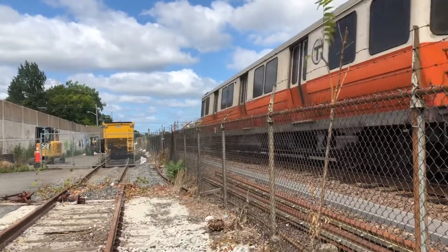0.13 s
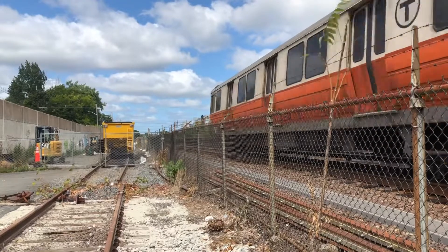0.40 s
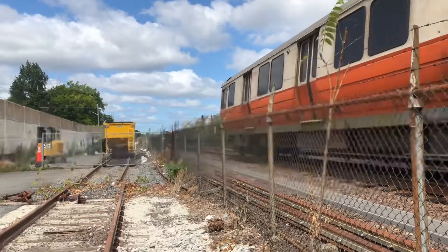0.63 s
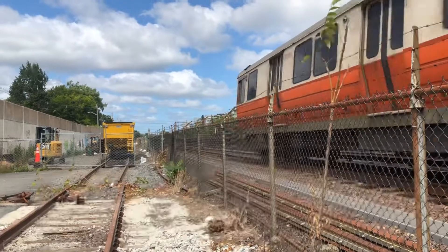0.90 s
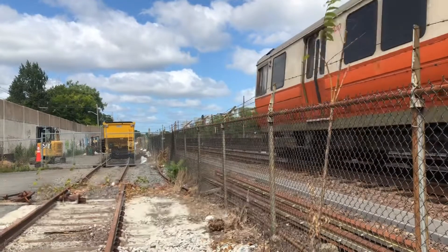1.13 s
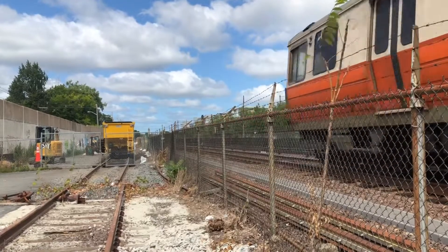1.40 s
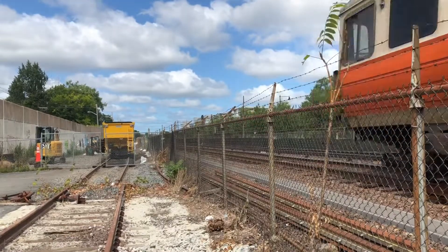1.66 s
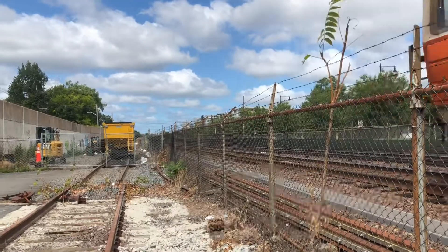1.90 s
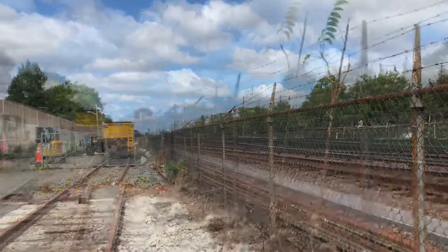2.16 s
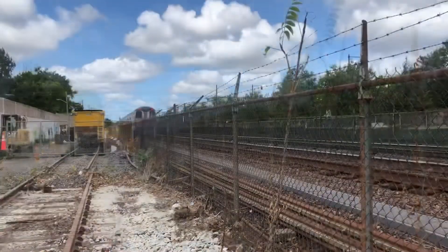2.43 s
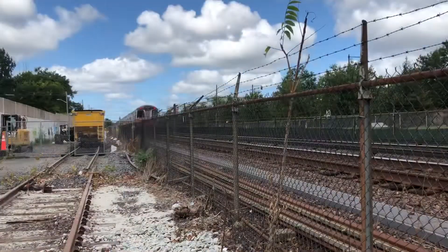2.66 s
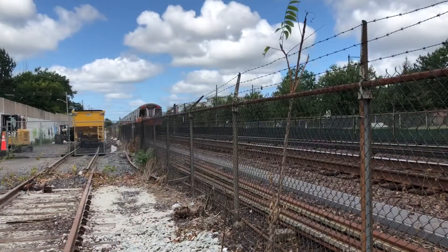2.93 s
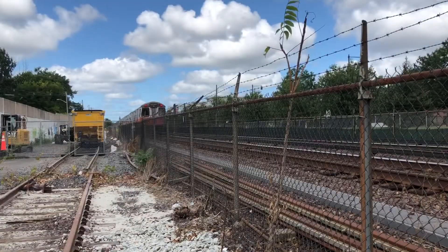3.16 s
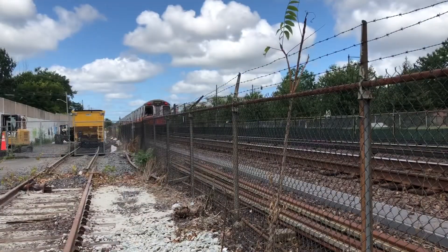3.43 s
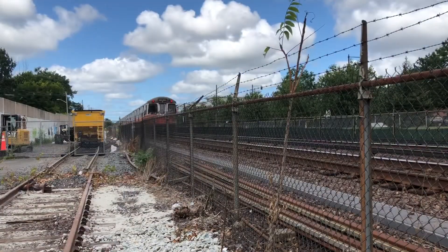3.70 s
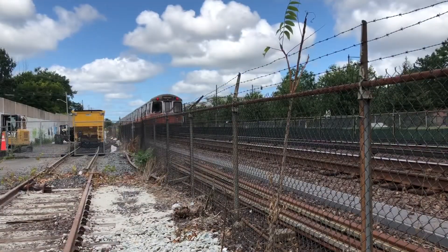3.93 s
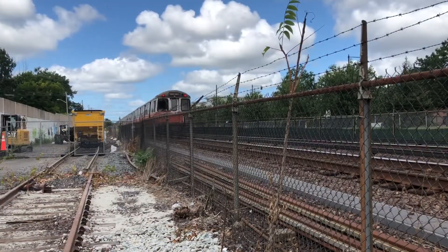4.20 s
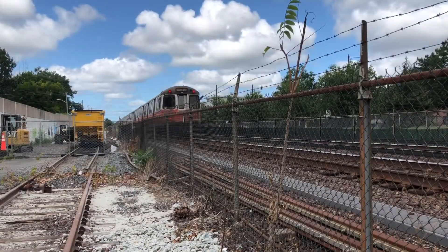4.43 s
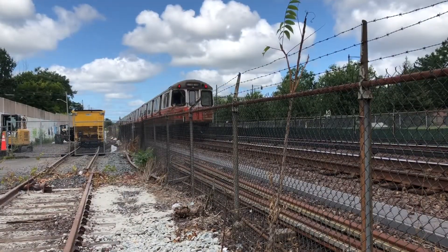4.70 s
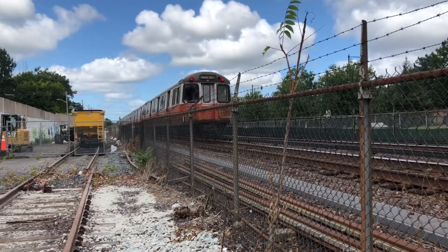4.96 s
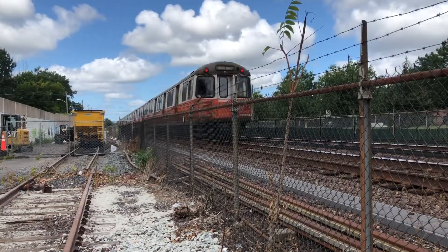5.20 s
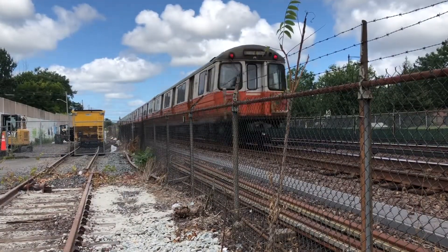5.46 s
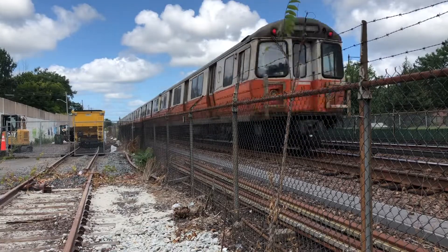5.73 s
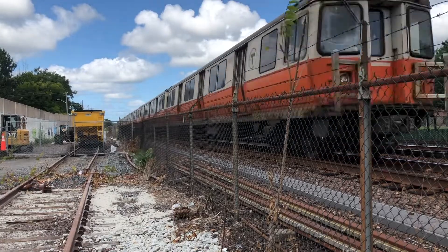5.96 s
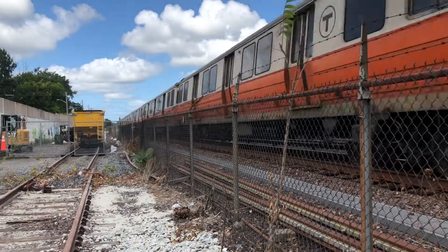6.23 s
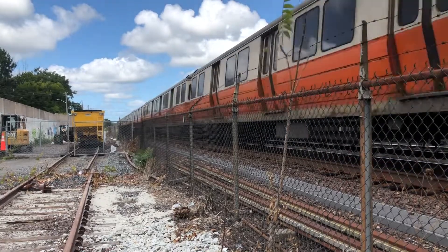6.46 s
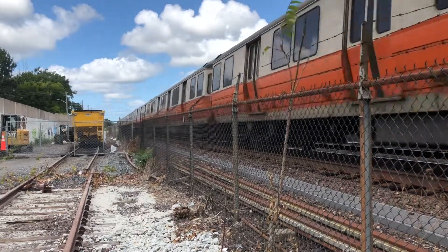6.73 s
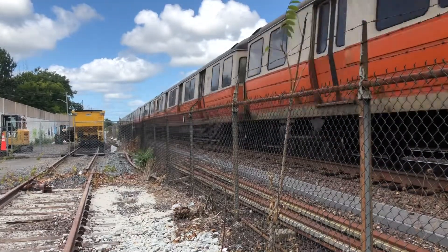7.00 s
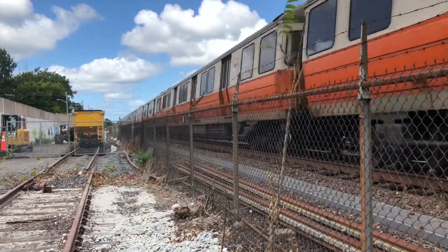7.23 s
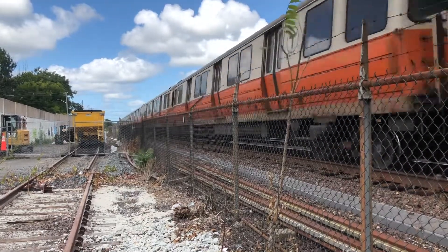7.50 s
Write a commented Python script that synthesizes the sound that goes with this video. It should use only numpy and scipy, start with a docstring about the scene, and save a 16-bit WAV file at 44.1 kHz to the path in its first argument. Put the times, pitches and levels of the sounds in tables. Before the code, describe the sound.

Close beside railway tracks outdoors, heard evenly in both channels. From 0 to 1.3 s an electric train rolls away in a loud, rough roar with low rumble, dense clacks and thuds about every 0.1 s, and rough chirping squeaks around 4.5 kHz roughly every 0.2 s. At about 1.4 to 1.7 s a piercing, very high squeal flares and fades while the roar falls; looser rolling noise and clatter remain until 2.4 s. At 2.5 s it drops to near quiet: faint treble fizz, tiny ticks, distant low hum. From 4.3 s light clacks approach; steel hisses swell near 4.0, 4.8, 5.55 and, strongest, 6.35 s. Clacks grow heavier from 5.4 s. At 6.4 s a bright flange scrape rings with thin sinking whines, fading by 6.75 s. A weaker hiss comes at 7.1 s, and the roar swells to full loudness by the end at 7.6 s.

```python
"""Beside a yard fence, one microphone: an electric train rolls away, a wheel squeaking once a turn and another
squealing high. After a sudden drop to near quiet a second train comes up from afar, clacking over rail joints,
hissing in regular swells, and scrapes a wheel into ringing as it arrives. Tilting coloured noise makes the roar,
rumble and hiss; noise bursts ring the rail; stick-slip tones squeak, squeal and whine; resonances ring and hum."""
import sys
import numpy as np
from scipy import signal
from scipy.io import wavfile
from scipy.ndimage import uniform_filter1d, minimum_filter1d

SR = 44100
rng = np.random.default_rng(int(sys.argv[2]) if len(sys.argv) > 2 else 0)


def wrap_up_sound(samples):
    """Save the sound to the file named by the first command line argument, as 16-bit audio."""
    columns = np.atleast_2d(samples).T
    # keep every value between -1 and 1, then stretch to whole-number steps
    tamed = np.clip(columns, -1, 1)
    steps = np.round(tamed * 32767).astype(np.int16)
    wavfile.write(sys.argv[1], SR, steps)


def amplitude_ratio(level_db):
    """Convert a level in decibels to the matching linear amplitude (field) ratio."""
    exponent = np.asarray(level_db, float) / 20
    return 10 ** exponent


N = 336042  # length in samples

# rolling noise of wheels on rails: [t/s, roar level/dB, roar tilt/dB per octave,
# rumble level/dB, rumble tilt/dB per octave]
ROLLING_NOISE = [(0, -12, -.8, -20, 0.5), (.35, -12, 0.1, -18, -0.5), (.86, -14.5, 0.86, -17.5, 4),
                 (1.385, -17.5, -0.5, -16, -0.5), (1.42, -22.5, -2.5, -27.5, 1),
                 (1.98, -18, 0.4, -25.5, -5), (2.2, -16.5, -0.5, -23, 2), (2.25, -26, -0.5, -22.5, -0.5),
                 (2.46, -26.5, -1.5, -30, 5), (2.5, -34.5, .1, -35.5, -4), (3.1, -33, 0.6, -35.5, .1),
                 (4.03, -32, 1.35, -33.5, 1), (4.67, -29.5, 1.6, -28.5, 1.5), (5.04, -29, 1.1, -31.5, 4.5),
                 (5.47, -25, 1.5, -25.5, 3), (6.09, -23.5, 0.4, -29, 2.5), (6.53, -18, 1.5, -23, 5),
                 (6.99, -20, -0.5, -28.5, 7.5), (7.29, -17, -0.7, -28.5, 10.5), (7.62, -11, 0.3, -29, 8)]
# modes of rail and wheel, rung by the joints and singing under the rolling load:
# [f/Hz, nominal width/Hz, blow level before tilt/dB, singing level re roar/dB]
RAIL_MODES = [(717, 168, 8.5, -19), (975, 92, 2, -42), (1096, 170, -2, -22), (1517, 113, -5, -24.5),
              (1840, 96, -17, -27), (2110, 130, -10.5, -44), (2437, 160, -12.5, -27),
              (3263, 120, -16, -26.5), (4200, 75, -19, -30), (5260, 68, -21, -32), (6370, 180, -21, -29.5)]


def evened(x):
    """Scales to rms 1."""
    return x / np.sqrt(np.mean(x ** 2) + 1e-20)


def add(mix, start_s, sound):
    """Mixes a sound in at a time, cut off where the mix ends."""
    part = mix[round(start_s * SR):][:len(sound)]
    part += sound[:len(part)]


def band(x, lo_hz, hi_hz):
    """Band-pass."""
    sos = signal.butter(4, [lo_hz, min(hi_hz, SR / 2.1)], "bandpass", fs=SR, output="sos")
    return signal.sosfilt(sos, x)


def resonate(x, hz, width):
    """A resonance of gain 1 at a fixed or gliding pitch: shifts it to zero, smooths, and shifts back."""
    turn = np.exp(2j * np.pi * np.cumsum(hz * np.ones(len(x))) / SR)
    decay = np.exp(-np.pi * abs(width) / SR)
    return 2 * (turn * signal.lfilter([1 - decay], [1, -decay], x / turn)).real


def columns(rows):
    """Start time, and every further column sample by sample."""
    s, *rest = np.transpose(rows)
    t = np.arange(s[0], s[-1], 1 / SR)
    return [s[0]] + [np.interp(t, s, c) for c in rest]


def wobble(count, rate_hz):
    """Slow random drift of rms 1."""
    return evened(uniform_filter1d(rng.standard_normal(count), size=round(SR / rate_hz)))


def wash(colour, s, level_db, tilt, pivot_hz, patchy_db, flicker_db, size):
    """Noise of a given colour that tilts about a pivot, with drifting patches and a shared flicker."""
    hop = size // 4
    hz = np.fft.rfftfreq(size, 1 / SR) + 1  # keeps the logarithms finite
    frames = N // hop + 5
    a, b, patches = rng.standard_normal((frames, len(hz), 3)).T
    patches = uniform_filter1d(patches, size=8, axis=0)  # over frequency
    patches = evened(uniform_filter1d(patches, size=8, axis=1))  # over time
    flicker = evened(uniform_filter1d(rng.standard_normal(frames), size=4))
    f, db = np.transpose(colour)
    shape_db = np.interp(np.log(hz), np.log(f), db, left=-100, right=-100)
    shape_db = shape_db - 10 * np.log10(np.sum(amplitude_ratio(shape_db) ** 2))  # unit total power
    t = np.arange(frames) * hop / SR
    tilted_db = np.log2(hz / pivot_hz)[:, None] * np.interp(t, s, tilt)
    moving_db = np.interp(t, s, level_db) + patchy_db * patches + flicker_db * flicker
    field = amplitude_ratio(shape_db[:, None] + tilted_db + moving_db)
    return signal.istft((a + 1j * b) * field, nperseg=size, noverlap=size - hop)[1][:N]


def slip(hz, rough, width):
    """A stick-slip tone of rms near 1: a sine with a share of narrow noise around it."""
    fuzz = evened(resonate(resonate(rng.standard_normal(len(hz)), hz, width), hz, width))
    sine = np.sin(2 * np.pi * np.cumsum(hz) / SR)
    return np.sqrt(2 - 2 * rough) * sine + np.sqrt(rough) * fuzz


def rolling():
    """Wheels rolling on rails roar and the car bodies rumble: two coloured noises that tilt over time."""
    # spectra of roar and rumble: [f/Hz, relative level/dB per Hz]
    roar_colour = [(120, -32), (200, 1.5), (238, 0.5), (762, -1), (1140, -10), (1290, -12.5), (1640, -14),
                   (2950, -23.5), (3250, -21), (3990, -22), (4540, -23), (4910, -25.5), (9000, -36),
                   (11700, -70), (19800, -120)]
    rumble_colour = [(18, -49), (30, -5), (75, -14), (113, -1), (206, -2.5), (260, -10), (340, -20),
                     (570, -120)]
    s, level_db, tilt, bass_db, bass_tilt = np.transpose(ROLLING_NOISE)
    roar = wash(roar_colour, s, level_db, tilt, pivot_hz=630, patchy_db=2.0, flicker_db=0.87, size=512)
    rumble = wash(rumble_colour, s, bass_db, bass_tilt, pivot_hz=130, patchy_db=1.67, flicker_db=0.9,
                  size=1024)
    return roar + rumble


def clacks():
    """Each joint: a short rattle rings the rail; slower low waves thud a little later; a crack on top."""
    # wheels over rail joints: [t/s, knock level/dB, nominal thud level/dB, nominal crack level/dB,
    # rattle length/s]
    joints = [(0.073, -15, -13.5, -23.5, .021), (0.162, -25, -9.5, -23, .035),
              (.255, -11.5, -11.5, -16.5, 0.023), (.349, -22, -7.5, -27, .025),
              (.454, -15.5, -9, -19, 0.0092), (.551, -18, -6.5, -24, 0.036), (0.655, -9, -13, -19, 0.0075),
              (.854, -14.5, -8, -21, 0.017), (1.058, -17.5, -5, -28, 0.013), (1.173, -22, -11, -41, 0.01),
              (1.269, -18, -11, -37, .021), (1.566, -26, -14, -28, 0.023), (1.745, -21, -14, -32, 0.035),
              (1.782, -25, -12.5, -28, 0.011), (1.965, -21, -9, -22, .025), (2.075, -27, -24, -26.5, .029),
              (2.162, -20.5, -16.5, -29, .02), (2.295, -29, -29.5, -34, .029),
              (2.359, -30, -21, -37, 0.012), (4.307, -29.5, -32, -52, 0.043), (4.408, -35, -38, -55, .028),
              (4.466, -30, -22, -36, .019), (4.618, -29.5, -23, -38, 0.037), (4.77, -44, -31, -44, .025),
              (4.931, -32.5, -29, -52, 0.041), (5.053, -28, -32, -53, 0.07),
              (5.095, -27.5, -28, -36, 0.035), (5.214, -27.5, -30, -50, 0.048),
              (5.248, -31, -23, -43, .031), (5.37, -23.5, -28.5, -49, 0.054),
              (5.398, -23.5, -14, -29, 0.035), (5.529, -31, -23, -42, 0.035), (5.555, -30, -16, -37, .03),
              (5.841, -19, -17.5, -45, 0.034), (5.869, -30, -25, -44, 0.022),
              (5.998, -22, -16.5, -41, 0.064), (6.154, -19.5, -12.5, -41, 0.022),
              (6.432, -23, -10.5, -25, .025), (6.612, -14, -11.5, -21, 0.018),
              (6.717, -29, -25, -26.5, .034), (6.767, -15.5, -19, -29, 0.015), (6.864, -25, -36, -48, .011),
              (7.279, -23.5, -28, -32, 0.03), (7.414, -20.5, -33, -39, .01), (7.503, -23, -37, -44, .022)]
    knock_tilt = 3.5  # dB per octave about 900 Hz
    out = np.zeros(N)
    t = np.arange(SR // 5) / SR
    for s, knock_db, thud_db, crack_db, length in joints:
        a, c, d = rng.standard_normal((len(t), 3)).T
        # a first blow, then chatter
        rattle = (np.sign(a) + 1.64 * (t < .0004)) * np.exp(-(t / length) ** 2)
        knock = np.zeros(len(t))
        for hz, nominal_width, db, _ in RAIL_MODES:
            width = 1.57 * nominal_width
            mode = resonate(resonate(rattle, hz, width), hz, width)
            knock += amplitude_ratio(db + knock_tilt * np.log2(hz / 900)) * mode / np.sqrt(nominal_width)
        knock = band(knock, 347, 5400)
        knock = knock / np.sqrt(np.mean(knock[:SR // 40] ** 2))  # rms 1 over the first 25 ms
        thud = evened(band(c, 100.0, 407)) * (t / 0.02) * np.exp(1 - t / .012)
        crack = evened(evened(band(d, 2800, 7900)) + 0.28 * evened(band(d, 8900, 15000)))
        crack = crack * (1 - np.exp(-t / 0.0016)) * amplitude_ratio(-60 * t / 0.13)
        add(out, s, amplitude_ratio(knock_db) * knock + amplitude_ratio(thud_db) * thud + amplitude_ratio(crack_db) * crack)
    return out


def hiss():
    """Steel sliding on steel: a steady fine hiss plus swells that set in quickly, climb to a peak and fade."""
    # steady hiss: [t/s, level/dB, tilt/dB per octave]
    steady_hiss = [(0, -28, -2.5), (.6, -32, -3), (1.2, -33.5, 0), (1.4, -35, -3.5), (1.63, -37.5, -1.5),
                   (1.85, -41.5, -3), (1.96, -31.5, -5), (2.2, -36, -5.5), (2.44, -48, -6), (2.51, -68, .1),
                   (3.8, -60, .1), (4.3, -53, -7), (5.1, -44, 6), (5.9, -39, -1.5), (6.75, -33, -1.5),
                   (7.0, -35.5, -3), (7.3, -32.5, -3), (7.62, -30.5, -5.5)]
    # spectrum of the hiss: [f/Hz, relative level/dB per Hz]
    hiss_colour = [(1470, -41), (2500, -5), (2940, -9.5), (4090, -7.5), (4550, -7), (9030, -5.5),
                   (13300, -8), (15700, -18.5)]
    # swells of the second train at nearly even intervals: [peak t/s, peak level/dB, lead-in/s]
    swells = [(4.0, -37, .13), (4.78, -33, 0.17), (5.55, -23.5, 0.15), (6.35, -15.5, 0.17),
              (7.08, -28, 0.029)]
    onset_s, rise_db_per_s, fall_db_per_s = 0.065, 60, 75
    swell_tilt = 0.5  # dB per octave
    t = np.arange(0, N / SR, .002)
    at, level_db, tilt = np.transpose(steady_hiss)
    steady_power = amplitude_ratio(np.interp(t, at, level_db)) ** 2
    swell_power = np.zeros(len(t))
    for s, db, lead in swells:
        onset = np.clip((t - s + lead) / onset_s + .5, 0, 1)  # half open one lead-in ahead of the peak
        slope_db = np.minimum(rise_db_per_s * (t - s), fall_db_per_s * (s - t))
        swell_power += onset ** 2 * amplitude_ratio(db + slope_db) ** 2
    power = steady_power + swell_power
    tilt = (np.interp(t, at, tilt) * steady_power + swell_tilt * swell_power) / power
    return wash(hiss_colour, t, 10 * np.log10(power), tilt, pivot_hz=8400, patchy_db=0.7, flicker_db=1.1,
                size=256)


def squeaks():
    """Stick-slip once a turn: a rough wobbling chirp grows to a late peak, where its overtones are strongest."""
    # chirps: [start t/s, length/s, peak level/dB, start f/Hz, end f/Hz]
    chirps = [(0.034, 0.09, -21, 4600, 4550), (0.22, 0.086, -18, 4610, 4520),
              (0.447, 0.066, -17, 4470, 4620), (.598, 0.094, -13, 4603, 4480),
              (0.792, 0.099, -13.5, 4614, 4400), (1.036, .055, -21, 4400, 4480),
              (1.197, 0.1073, -19.5, 4416, 4260), (1.401, 0.126, -22.5, 4350, 4290)]
    # overtones: [multiple of f, level at the peak re fundamental/dB]
    overtones = [(2, -17), (3, -25)]
    out = np.zeros(N)
    for s, length, peak_db, start_hz, end_hz in chirps:
        u = np.linspace(0, 1, round(length * SR))  # share of the length
        hz = start_hz + (end_hz - start_hz) * u + 40.3 * wobble(len(u), rate_hz=48)
        shape_db = np.interp(u, [0, 0.57, 1], [-10, 0, -12])
        tone = slip(hz, rough=0.75, width=126)
        upper = sum(amplitude_ratio(db) * slip(k * hz, rough=.7, width=200) for k, db in overtones)
        tone = tone + amplitude_ratio(shape_db) * upper
        add(out, s, amplitude_ratio(peak_db + shape_db) * tone * signal.windows.tukey(len(hz), .2))
    return out


def squeal():
    """Two wheel modes: a steady clean tone and a rough one that sinks towards it, in a skirt of friction noise."""
    # lower and higher squeal: [t/s, tone level/dB]
    low_levels = [(1.05, -49), (1.2, -41), (1.27, -34), (1.38, -12), (1.432, -8), (1.52, -15), (1.718, -32),
                  (1.87, -32), (2.1, -58)]
    high_levels = [(1.1, -47), (1.26, -36), (1.364, -29), (1.384, -20), (1.465, -21), (1.496, -11),
                   (1.708, -18), (1.836, -35), (2.0, -55)]
    sag_from_s = 1.5
    out = np.zeros(N)
    # levels, starting pitch in Hz, sag in Hz per s, share of noise
    for rows, top_hz, sag, rough in ((low_levels, 12646, 0, .15), (high_levels, 12890, 450, .6)):
        s, level_db = columns(rows)
        t = s + np.arange(len(level_db)) / SR
        hz = top_hz - sag * np.maximum(t - sag_from_s, 0)
        friction = band(rng.standard_normal(len(hz)), 12060, 13150)
        skirt = evened(resonate(friction, 12750, 700))
        tone = slip(hz, rough, width=140) + amplitude_ratio(-5) * skirt
        add(out, s, amplitude_ratio(level_db) * tone * signal.windows.tukey(len(hz), .1))
    return out


def scrape():
    """Flange friction noise drives the high modes of the wheel, with a broad bite near the start."""
    # ringing under the scrape: [t/s, level/dB]
    scrape_levels = [(6.37, -26), (6.41, -18), (6.48, -28), (6.596, -26.5), (6.702, -42), (6.75, -42)]
    # modes the scrape rings: [f/Hz, nominal width/Hz, relative level per root Hz of width/dB]
    wheel_modes = [(8830, 31, -9), (9590, 46, -4), (10400, 110, -1), (10900, 36, -10), (12500, 130, -1),
                   (12800, 84, -4), (14100, 54, -3), (14600, 110, 0), (15500, 60, -2)]
    out = np.zeros(N)
    s, level_db = columns(scrape_levels)
    noise = rng.standard_normal((len(level_db), len(wheel_modes) + 1)).T
    sink = np.linspace(1.008, .985, len(level_db))  # pitch sinks as the wheel draws level
    ring = np.zeros(len(level_db))
    for v, (hz, width, db) in zip(noise, wheel_modes):
        ring += amplitude_ratio(db) * np.sqrt(width) * evened(resonate(v, hz * sink, 0.94 * width))
    t = np.arange(len(ring)) / SR
    bite = evened(band(noise[-1], 5200, 8200)) * np.exp(-((t - .045) / 0.032) ** 2)
    sound = amplitude_ratio(level_db) * evened(ring) + amplitude_ratio(-16.5) * bite
    add(out, s, sound * signal.windows.tukey(len(ring), .15))
    return out


def whines():
    """Gliding narrow tones set in quickly, flicker and fade; high and far-gliding ones are fuzzier."""
    # short whines and whistles: [start t/s, end t/s, start f/Hz, end f/Hz, mid level/dB]
    glides = [ (.12, .45, 1680, 1590, -31), (.55, .66, 1575, 1550, -21), (.3, .42, 1950, 1940, -29),
              (.48, .66, 1900, 1880, -28), (.3, .58, 2140, 2100, -33), (.25, .36, 2430, 2430, -33),
              (.305, .345, 3260, 3210, -24), (1.62, 1.76, 4350, 4260, -39), (1.96, 2.1, 2380, 2360, -44),
              (2.05, 2.4, 4230, 4170, -41), (2.15, 2.4, 3270, 3200, -41), (2.25, 2.47, 5220, 5170, -50),
              (1.95, 2.1, 6290, 6230, -40), (6.45, 6.8, 4340, 4040, -38), (7.0, 7.6, 3600, 3350, -39),
              (1.3, 1.52, 10460, 10470, -47), (1.35, 1.5, 8020, 7970, -48), (2.42, 2.5, 10430, 10460, -44),
              (2.5, 2.9, 13030, 13030, -55), (2.55, 2.85, 15160, 15160, -47), (4.0, 5.4, 7127, 7127, -56),
              (4.42, 4.56, 10670, 10670, -45), (4.42, 4.56, 10140, 10120, -52),
              (4.63, 4.8, 10440, 10440, -41), (5.4, 5.52, 10450, 10450, -36),
              (5.69, 5.85, 10360, 10350, -40), (7.15, 7.35, 10440, 10380, -48),
              (6.39, 6.47, 5830, 5810, -20), (6.44, 6.6, 5820, 5820, -38), (6.385, 6.415, 6070, 6050, -22),
              (6.46, 6.63, 6480, 6330, -34), (6.37, 6.51, 7700, 8100, -25), (6.52, 6.68, 8000, 7850, -34),
              (6.5, 6.63, 8420, 8250, -35)]
    out = np.zeros(N)
    for start, end, start_hz, end_hz, db in glides:
        hz = np.linspace(start_hz, end_hz, round((end - start) * SR))
        # width in Hz: a floor, a share of the pitch, a share of the glide
        width = 12 + 0.0039 * start_hz + 0.41 * abs(end_hz - start_hz)
        t = np.arange(len(hz)) / SR
        fade_in, fade_out = t / 0.018, (t[-1] - t) / (0.22 * t[-1])
        edges = np.clip(np.minimum(fade_in, fade_out), 0, 1)
        level_db = db - 2 * (t / t[-1] - .5) + 2.5 * wobble(len(t), rate_hz=37)
        add(out, start, amplitude_ratio(level_db) * edges * slip(hz, min(0.15 + width / 120, .9), width))
    return out


def roar_db(t):
    """Level of the roar at given times."""
    s, level_db = np.transpose(ROLLING_NOISE)[:2]
    return np.interp(t, s, level_db)


def singing():
    """Rough rails keep each mode sounding in step with the roar; each waxes and wanes on its own."""
    out = np.zeros(N)
    t = np.arange(N) / SR
    for hz, nominal_width, _, db in RAIL_MODES:
        wax = np.interp(t, np.arange(64) / 8, rng.standard_normal(64))  # a new value every 1/8 s
        width = 1.7 * nominal_width
        mode = evened(resonate(resonate(rng.standard_normal(N), hz, width), hz, width))
        out += amplitude_ratio(db + 1.9 * wax) * mode
    return amplitude_ratio(roar_db(t)) * out


def hum():
    """The track bed hums under the second train: noise in one low resonance, its level wavering."""
    # hum: [t/s, level before wavering/dB]
    hum_levels = [(2.5, -49), (3.0, -45), (3.5, -36), (4.0, -44), (4.7, -37), (5.2, -40.5), (5.9, -30.5),
                  (6.6, -24.5), (7.0, -32), (7.36, -29.5), (7.62, -31)]
    hz, width = 153.1, 36  # Hz, each of two passes
    out = np.zeros(N)
    s, level_db = columns(hum_levels)
    noise = rng.standard_normal(len(level_db))
    ring = evened(resonate(resonate(noise, hz, width), hz, width))
    waver_db = 3 * wobble(len(ring), rate_hz=3.9)
    add(out, s, amplitude_ratio(level_db + waver_db) * ring)
    return out


def ticks():
    """Thin treble ticks: bursts of high noise with a sharp start and a short fizzing tail."""
    # ticks: [t/s, nominal level/dB]
    tick_levels = [(2.4932, -45), (2.5835, -40), (3.2136, -44), (3.3822, -49), (5.3994, -34)]
    out = np.zeros(N)
    t = np.arange(SR // 4) / SR
    for s, db in tick_levels:
        fizz = evened(band(rng.standard_normal(len(t)), 11700, 16000))
        add(out, s, amplitude_ratio(db) * fizz * (amplitude_ratio(-60 * t / .04) + .4 * amplitude_ratio(-60 * t / .5)))
    return out


def air():
    """Faint fizz of the yard: smooth far hiss in the high treble."""
    # spectrum of the fizz: [f/Hz, relative level/dB per Hz]
    air_colour = [(8500, -37), (10200, -1), (10800, -2), (13000, 1), (15700, 2), (15900, -40)]
    # fizz: [t/s, level/dB]
    air_levels = [(0, -60), (2.3, -68), (2.5, -49), (2.7, -50), (3.0, -54), (3.3, -52.5), (3.9, -50),
                  (4.4, -44.5), (5.0, -63), (5.4, -60), (7.62, -66)]
    s, level_db = np.transpose(air_levels)
    return wash(air_colour, s, level_db, 0 * s, pivot_hz=1, patchy_db=1.2, flicker_db=-1.5, size=256)


def scene():
    """All sources reach one microphone, heard alike on both channels."""
    track = rolling() + singing() + hum() + clacks()
    wheels = hiss() + squeaks() + squeal() + scrape() + whines()
    mono = track + wheels + air() + ticks()
    return np.array([mono, mono])


def low_pass(x):
    """Removes everything above the highest recorded frequency."""
    return signal.sosfilt(signal.butter(12, 16650, fs=SR, output="sos"), x)


def record(dry):
    """The microphone drops deep bass; a limiter holds peaks at full scale; a steep filter cuts the top."""
    heard = band(dry, 47, 21000)
    room = minimum_filter1d(1 / np.maximum(abs(heard), 1), size=133, axis=1)  # gain that peaks allow
    held = heard * uniform_filter1d(room, size=67, axis=1)
    edge = signal.firwin(511, 15750, window=("kaiser", 9), fs=SR)
    mix = np.clip(signal.oaconvolve(held, edge[None], "same"), -1, 1)
    return low_pass(mix)


dry = scene()
out = record(dry)
wrap_up_sound(out)
```